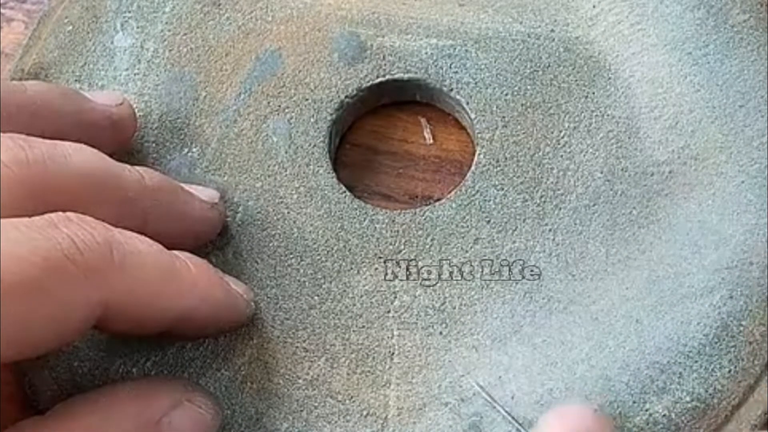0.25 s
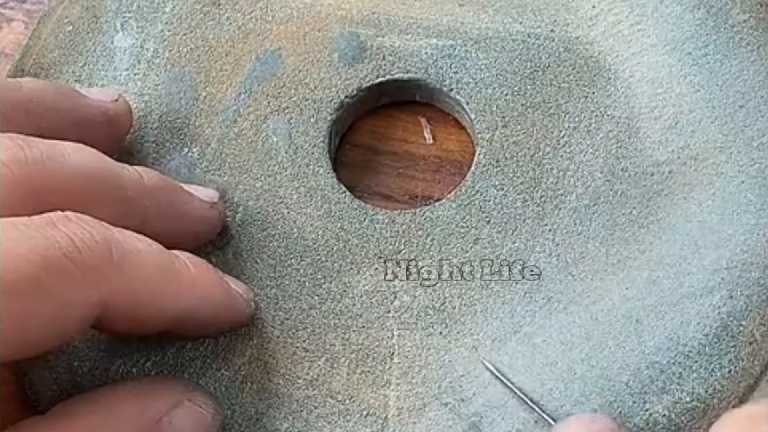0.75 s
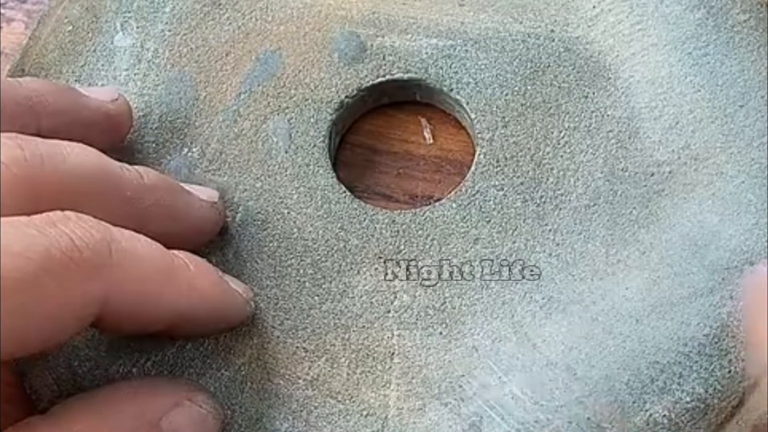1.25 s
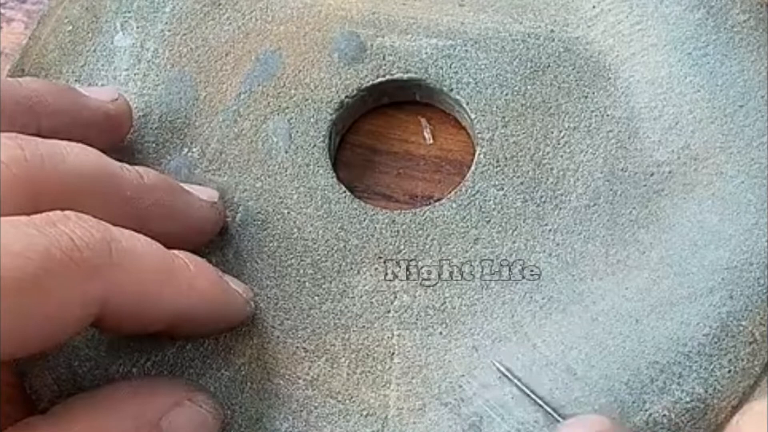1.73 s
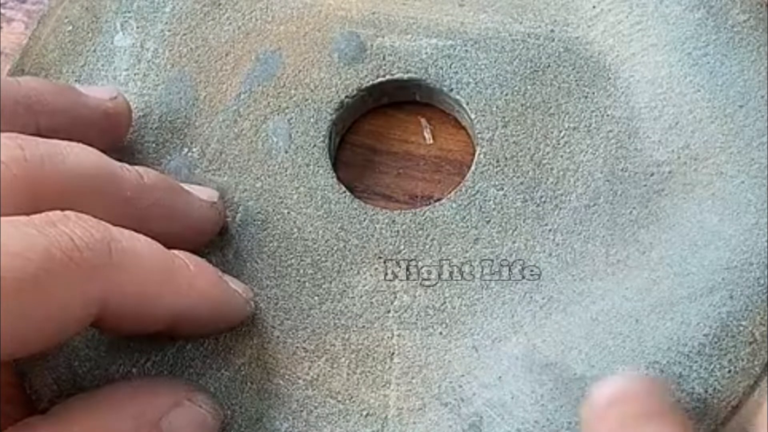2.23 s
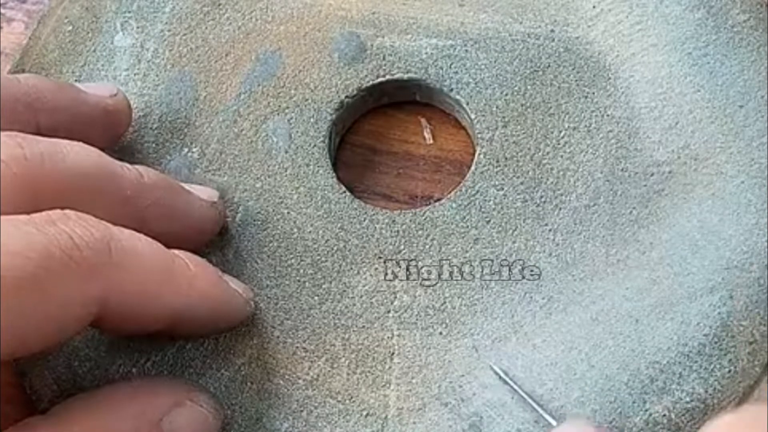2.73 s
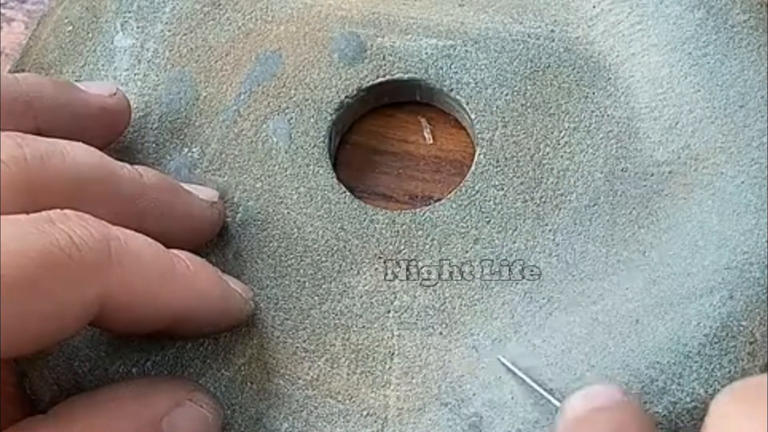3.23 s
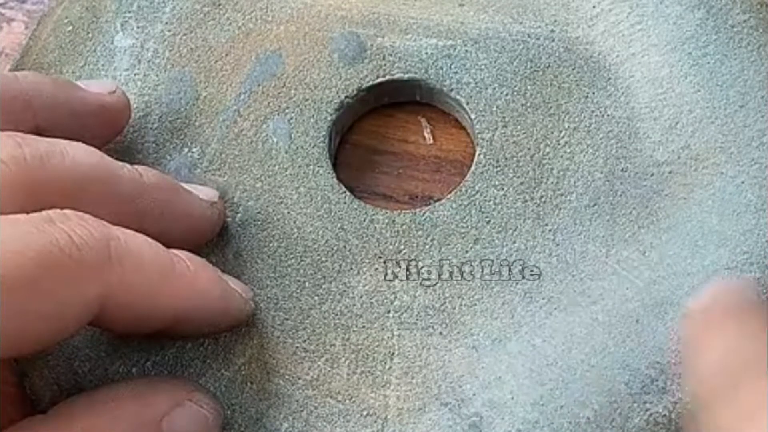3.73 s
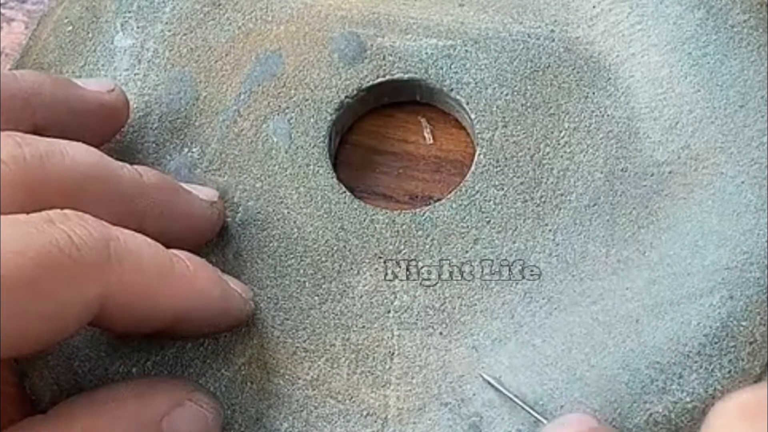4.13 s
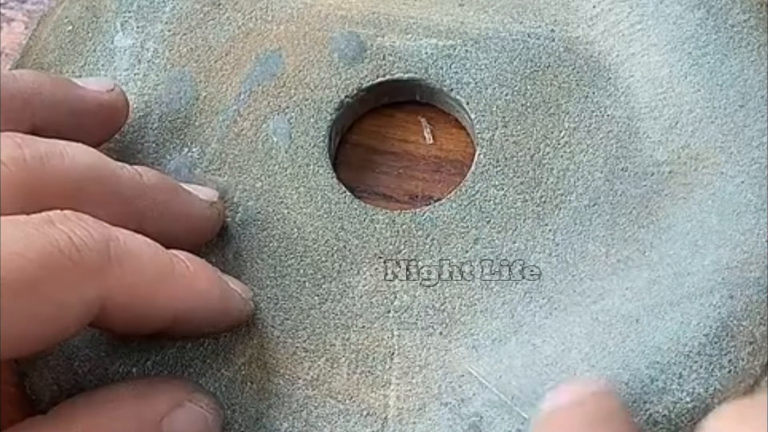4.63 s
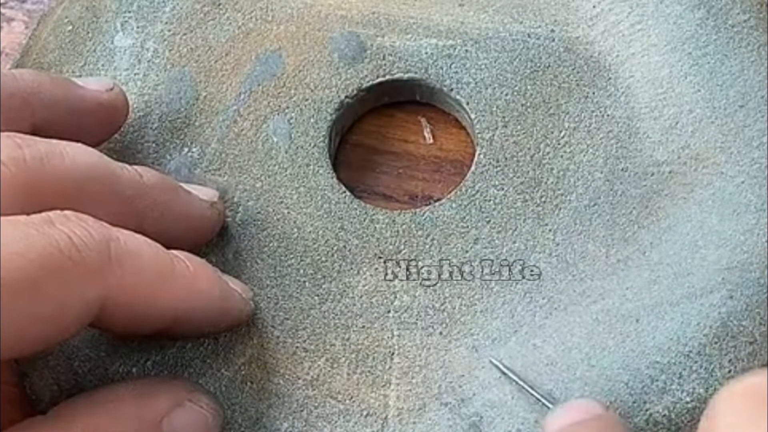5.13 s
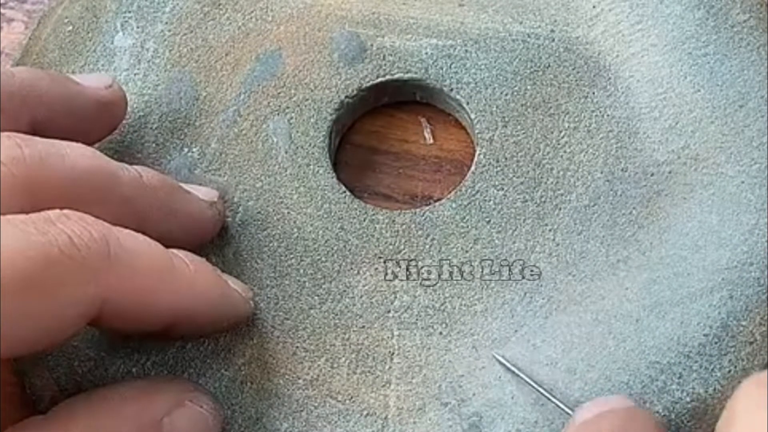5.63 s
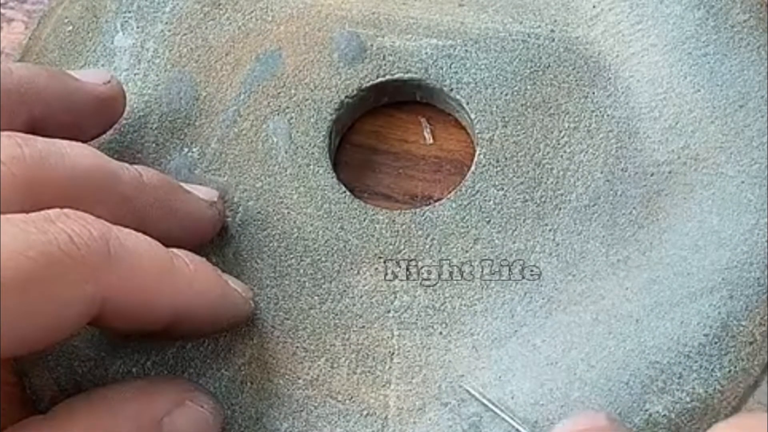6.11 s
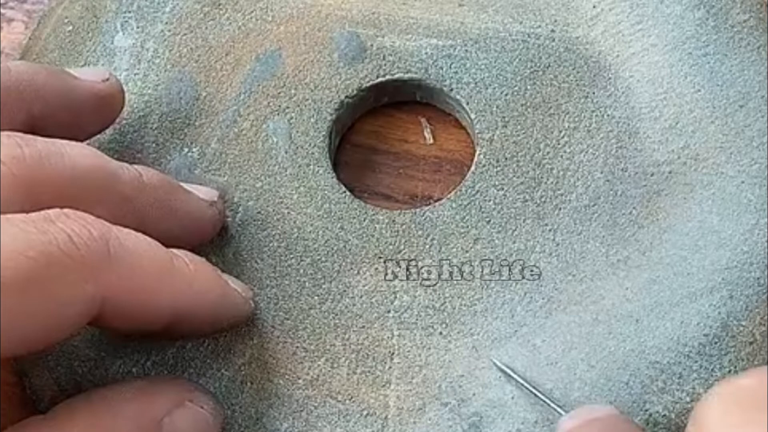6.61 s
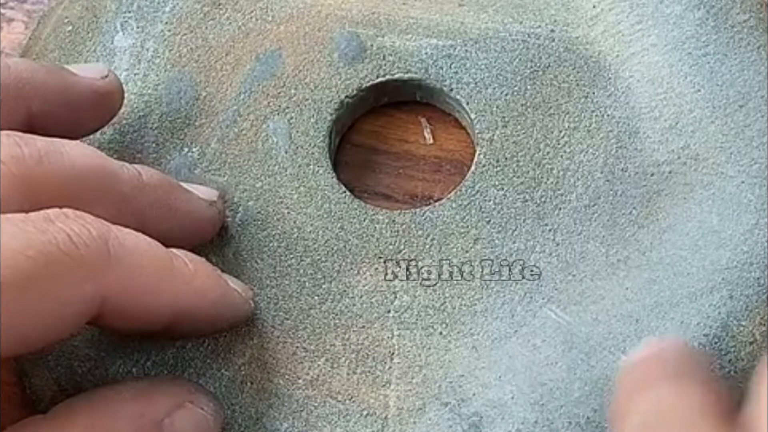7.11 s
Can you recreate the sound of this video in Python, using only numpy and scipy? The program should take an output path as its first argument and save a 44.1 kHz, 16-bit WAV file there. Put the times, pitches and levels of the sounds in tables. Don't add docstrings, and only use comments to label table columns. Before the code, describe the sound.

Dry, gritty metal-on-stone scraping, close to the microphone outdoors: seven fast bursts, the first caught mid-action and the last cut off. Each stroke swells and fades, mixing bright hiss with a woody low-mid growl, occasional grain clicks and thin wire tones. Between bursts are a faint bird whistle, soft hand brushes and one light tap. Low wind lumps and a faint far hush lie underneath, with only a short, faint reflection.

```python
import sys
import numpy as np
from scipy import signal
from scipy.fft import rfft, irfft, next_fast_len
from scipy.io import wavfile
from scipy.ndimage import uniform_filter1d

SR = 44100
rng = np.random.default_rng(int(sys.argv[2]) if len(sys.argv) > 2 else 0)


def persist_wave(psi):
    counts = np.round(np.clip(psi, -1, 1) * 32767).astype(np.int16)
    wavfile.write(sys.argv[1], SR, np.atleast_2d(counts).T)


def elevation(decibels):
    levels = np.asarray(decibels, float)
    return 10 ** (levels / 20)


N = 324840

# (start [s], scrape level [dB], its rise over the stroke [dB], wheel over scrape [dB], its rise [dB])
OUT_STROKES = [(-.11, -39.5, -6, 7, 4), (.18, -38, 17.5, -3, 26), (.972, -39.5, 6.5, 2.5, -9),
               (1.262, -33.5, 12, -1.5, 13), (2.147, -38.5, 4, 7.5, 5.5), (2.423, -35.5, 8.5, -1, 11),
               (3.273, -39, 4, 2.5, -1), (3.555, -39, 16.5, 1.5, -2), (4.425, -36, 15, 1.5, -6),
               (4.722, -34, 10, -1.5, 9), (5.75, -36.5, 10, -2.5, 10), (6.05, -33.5, 10.5, 1, 8),
               (7.035, -38.5, 11.5, -0.5, -8), (7.318, -34, 11, -3.5, -7)]
BACK_STROKES = [(.032, -34.5, -7, 9.3, -3.5), (.298, -35.5, 3.5, 6.7, 6), (1.111, -32, -4, 9.4, 10.5),
                (1.394, -31.5, 5, 6.4, 7), (2.27, -34, -0.5, 9.2, 14), (2.552, -36, -22.5, 8.5, 21),
                (3.404, -35, 0, 6.6, 4.5), (3.665, -36, -9.5, 7.5, 25), (4.57, -32.5, -1, 5.8, 6),
                (4.85, -31.5, -6.5, 6.7, 12), (5.886, -32, -9, 7.6, 15), (6.159, -33, -13.5, 8.2, 16),
                (7.184, -33, 4, 5.1, 5)]
# (drag left at the start [dB], drag left at the end [dB],
# share of the stroke where speed peaks [0-1], power of speed while gaining [1], while slowing [1])
HAND_SPEED = [(-20.5, -21, 0.38, 0.83, 1.2), (-23.5, -25.5, 0.51, 1.74, 1.42),
              (-4.5, -26.5, 0.49, 1.15, 2.1), (-23.5, -32.5, 0.31, 1.34, 2.63)]
# (low rocking of the wheel [dB], table knock [dB], shank 5-7 kHz [dB],
# tip 12-15 kHz [dB], upper over lower face [dB])
GRIPS = [(0.5, -1.5, -4.5, 1, -3.5), (1.5, -0.5, -1.5, 1, -2), (1, 2.5, -1.5, -2, -3.5),
         (0, -1.5, -0.5, 0.5, -0.5)]
# (face [dB], table knock [dB], shank [dB], tip [dB],
# upper over lower face [dB])
PATCHES = [(-7, -2.5, -2.5, -1.7, -2.5), (-5.5, -1, -0.2, -1.2, -0.5), (-1.9, 1.2, 1.5, 0.2, 1),
           (-2.2, 0.5, 1.2, -3, 0.9), (-4.5, 0.2, 1.1, -2, 0.2), (-0.5, 0.1, 1.9, -2.5, -1.7),
           (-2.1, 1.5, 2.5, -3, 0.3)]
LAST_S = 0.18
OUT_ARCH, BACK_ARCH = 0.85, 1.06
LANDING_S, TURN_S = 0.03, 0.004

# (frequency [Hz], width [Hz], level [dB])
WHEEL_MODES = [(218, 39.3, -6), (261.5, 12.6, -7.5), (327, 38, -3.5), (395, 52.3, -4.5), (430, 106, -9.5),
               (499.6, 38.4, -11.5)]
# (frequency [Hz], width [Hz], level [dB])
TABLE_MODES = [(610, 94, -5.5), (738, 210, -4), (951, 88, 1), (1128, 108, 0.5), (1250, 440, -8.5)]
# (frequency [Hz], width [Hz], level [dB])
WIRE_MODES = [(5780, 31, -21), (6230, 24, -21), (6730, 40, -20), (12100, 30, -29), (12230, 20, -26)]
WANDER_DB, WANDER_S = 2.5, 0.09
# (frequency [Hz], density [dB per Hz])
FACE_SPECTRUM = [(1200, -36), (1600, -26.5), (1900, -3), (2150, -3.5), (2500, 1), (2900, 2), (3400, 5),
                 (3950, 3.5), (4250, -3), (4700, -8.5), (6000, -29)]
# (frequency [Hz], density [dB per Hz])
SCRAPE_SPECTRUM = [(3500, -20), (4400, -13), (5000, -14), (5600, -8.5), (7200, -11), (8900, -11.5),
                   (9450, -11.5), (9700, -2), (10300, -3.5), (10900, -5), (11300, -10), (12400, -10),
                   (13600, -17.5), (15900, -20)]
# (time [s], peak level [dB])
GRAINS = [(0.0623, -23), (1.431, -22), (1.4334, -21), (1.498, -35), (2.229, -20.5), (3.771, -18),
          (4.4378, -26), (4.6433, -28), (5.79, -25), (5.9544, -10.5), (6.1294, -30), (6.2605, -17.5),
          (7.055, -22)]
# (time [s], length [s], frequency [Hz],
# width [Hz], level [dB])
THIN_NOTES = [(.095, .048, 5810, 50, -43), (.097, .022, 6760, 40, -45), (.145, .05, 2730, 45, -47),
              (1.005, .03, 3020, 30, -42), (1.11, .04, 3340, 50, -50), (1.025, .045, 2665, 50, -48),
              (1.055, .035, 2480, 60, -46), (1.077, .038, 2960, 15, -39), (1.46, .105, 12230, 10, -51),
              (2.33, .08, 5810, 60, -50), (2.6, .085, 12230, 10, -52), (3.6, .1, 12230, 20, -57),
              (3.74, .06, 12230, 10, -50), (4.44, .12, 5900, 50, -50), (4.63, .065, 5830, 50, -45),
              (5.86, .04, 3245, 20, -44), (5.865, .07, 2895, 20, -44), (5.95, .065, 5810, 35, -44),
              (6.08, .065, 12230, 15, -49), (6.1, .065, 2650, 50, -47), (6.35, .025, 2480, 60, -57)]

# (time [s], length [s], level [dB], frequency [Hz], width [Hz])
TOUCHES = [
    (.922, .045, -54, 2200, 2000),
    (.922, .04, -65, 4500, 3000),
    (6.66, .14, -54, 3600, 2400),
    (6.69, .08, -57, 2800, 300),
    (6.69, .06, -62, 10000, 5000),
    (1.325, .05, -34, 200, 60),
    (1.7, .04, -72, 10000, 4000),
]
# (time [s], level [dB])
TAPS = [
    (3.0457, -30),
    (3.047, -38),
]

# (time [s], length [s], level [dB], frequency [Hz], fade [dB])
BIRD_NOTES = [
    (0.461, 0.077, -42.5, 2640, -13),
    (0.72, .05, -51, 2120, -12),
    (0.748, .085, -62, 1860, -6),
    (5.132, 0.063, -41.5, 2640, -25),
    (5.489, .04, -61, 2210, -13),
    (5.502, 0.11, -54, 1880, -9.5),
]
RISE_S, DROP, DROP_S = 0.012, 0.057, 0.017

# (time [s], level [dB], width [s])
GUSTS = [(0.09, -41.0, 0.09), (0.19, -39.5, 0.05), (0.61, -47, 0.04), (0.77, -37.5, 0.097),
         (0.9, -35, 0.038), (1.0, -41, 0.04), (1.22, -42, 0.07), (1.42, -39.5, 0.05), (1.65, -36, 0.038),
         (1.83, -39.0, 0.083), (1.95, -32.5, 0.027), (2.2, -36, 0.05), (2.32, -43, 0.19),
         (2.53, -32.5, 0.031), (2.64, -53, 0.051), (3.42, -36.5, 0.065), (3.52, -39, 0.092),
         (3.62, -36, 0.029), (3.77, -45.5, 0.062), (3.969, -29.5, 0.045), (4.05, -39.5, 0.02),
         (4.11, -44, 0.032), (4.63, -38.0, 0.07), (4.77, -40.0, 0.09), (4.99, -43, 0.04),
         (5.82, -38.5, 0.033), (5.95, -30, 0.05), (6.15, -35, 0.045), (6.3, -30, 0.063),
         (7.25, -40.0, 0.15)]
# (time [s], level [dB])
BREEZE = [(0., -51), (.6, -55.5), (1., -50), (2.6, -51.5), (3., -59), (3.5, -56), (4.3, -58), (5., -47.5),
          (5.7, -61.5), (6.2, -46.5), (6.9, -66), (7.37, -56)]
# (frequency [Hz], density [dB per Hz])
WIND_SPECTRUM = [(20, -33), (31, -4), (42, -5), (58, -1), (80, -7), (128, -9), (162, -29), (300, -35.5),
                 (500, -74)]

# (start [s], end [s], level at the start [dB])
HUSH_PAUSES = [
    (.47, 0.95, -59.5),
    (1.557, 2.13, -55.5),
    (2.72, 3.252, -57),
    (3.83, 4.41, -57),
    (5.01, 5.73, -54.5),
    (6.335, 7.014, -54.5),
]
# (frequency [Hz], density [dB per Hz])
AIR_SPECTRUM = [(53, -16), (90, -6), (136, 1.5), (165, -10), (196, -4), (266, -10), (401, -6), (498, -12.5),
                (995, -14), (1300, -18.5), (6680, -29.5), (8700, -30.5), (12000, -44.5), (15900, -61)]
SINK_DB_PER_S, SINK_BRIGHT_DB = 11.5, -0.5


def strokes():
    scrape, shove, rock, low_face, high_face, knock, shank, tip = pressure()
    slips = np.cumsum(SR / 280 * rng.gamma(4, 1 / 4, 4000)).astype(int)
    fine = grit(slips, 2.6, 0.0009, 0.8)
    coarse = grit(slips, 2.6, 0.0007, 0.7)

    wheel = steadied(modes(coarse + fine, WHEEL_MODES[2:], WANDER_DB), 0.054, 0.44)
    rocking = steadied(modes(fine, WHEEL_MODES[:2], WANDER_DB), 0.011, 0.3)
    table = steadied(modes(coarse, TABLE_MODES, WANDER_DB), 0.0082, 0.4)
    out = shove * wheel + elevation(-9) * rock * rocking + elevation(-6.5) * knock * table

    face = steadied(patchy(colour(coarse, FACE_SPECTRUM), 2.9, bins=3, frames=30), 0.013, 0.55)
    upper_face = above(face, 2610)
    out += low_face * (face - upper_face) + high_face * upper_face

    hiss = patchy(colour(fine + 0.5 * coarse, SCRAPE_SPECTRUM), 3.5, bins=5, frames=30)
    hiss = steadied(hiss + elevation(38) * modes(fine, WIRE_MODES, WANDER_DB), 0.016, 0.3)
    upper, top = above(hiss, 7800), above(hiss, 11300)
    return out + shank * (hiss - upper) + scrape * (upper - top) + tip * top


def pressure():
    gains = np.zeros((8, N))
    rows = sorted(OUT_STROKES + BACK_STROKES)
    for k, (s, scrape_db, rise_db, wheel_db, wheel_rise_db) in enumerate(rows):
        place = k % len(HAND_SPEED)
        trails_off = place == len(HAND_SPEED) - 1 or k == len(rows) - 1
        end = s + LAST_S if trails_off else rows[k + 1][0]
        start_db, end_db, peak, gaining, slowing = HAND_SPEED[place]
        rock_db = GRIPS[place][0]
        face_db, *patch_db = PATCHES[k // len(HAND_SPEED)]
        knock_db, shank_db, tip_db, edge_db = np.add(GRIPS[place][1:], patch_db)

        lead = TURN_S if place else LANDING_S
        t = np.arange(max(s - lead, 0), end + TURN_S, 1 / SR)
        fade_in = (t - s + lead) / (lead + TURN_S)
        fade_out = (end - t) / TURN_S / 2 + 0.5
        overlap = np.clip(np.minimum(fade_in, fade_out), 0, 1)

        u = np.clip((t - s) / (end - s), 0, 1)
        speed = np.sin(np.pi * np.interp(u, [0, peak, 1], [0, 0.5, 1]))
        drag = elevation(start_db + (end_db - start_db) * u)
        arch_db = 20 * np.log10(abs(speed) ** np.where(u < peak, gaining, slowing) + drag)
        wheel_arch = BACK_ARCH if k % 2 else OUT_ARCH
        shove_db = wheel_db + wheel_rise_db * (u - 0.5) + (wheel_arch - 1) * arch_db
        table_db = 0.35 * shove_db + knock_db
        over_db = (0, shove_db, shove_db + rock_db, face_db - edge_db, face_db + edge_db,
                   table_db, shank_db, tip_db)
        for gain, db in zip(gains, over_db):
            add(gain, t[0], elevation(scrape_db + rise_db * (u - 0.5) + arch_db + db) * overlap)
    return gains


def grit(at, spread_db, seconds, steady):
    inside = at < N
    slips = np.zeros(N)
    slips[at[inside]] = elevation(spread_db * np.minimum(rng.exponential(1, len(at)), 4))[inside]
    bursts = signal.oaconvolve(slips, np.exp(-np.arange(400) / SR / seconds))[:N]
    return evened((steady + evened(bursts)) * rng.standard_normal(N))


def grains():
    puffs = np.zeros(N)
    n = np.arange(400)
    for s, db in GRAINS:
        decay = elevation(db - 5 - n / SR / 0.00059)
        add(puffs, s, decay * rng.standard_normal(400) * np.minimum(n / 12, 1))
    point = colour(colour(puffs, SCRAPE_SPECTRUM), [(9000, -2), (13000, 1)])
    return elevation(-0.5) * colour(puffs, FACE_SPECTRUM) + elevation(3) * point


def thin_notes():
    out = np.zeros(N)
    for s, length, hz, width, db in THIN_NOTES:
        note = steadied(resonate(rng.standard_normal(8000), hz, width), 0.0078, 0.55)
        note = note[-round(length * SR):]
        add(out, s, elevation(db) * note * signal.windows.tukey(len(note), 0.3))
    return out


def touches():
    out = np.zeros(N)
    for s, length, db, hz, width in TOUCHES:
        noise = rng.standard_normal(round(length * SR))
        brush = resonate(resonate(noise, hz, width), hz, 2 * width)
        add(out, s, elevation(db) * evened(brush) * np.hanning(len(brush)))
    return out


def taps():
    out = np.zeros(N)
    t = np.arange(3000) / SR
    tones = sum(level * np.sin(2 * np.pi * hz * t) for hz, level in ((7800, 1), (11600, 0.22), (14200, 0.08)))
    ring = t / 0.00009 * np.exp(-t / 0.00025) * tones
    noise = resonate(resonate(rng.standard_normal(3000), 8400, 3000), 7600, 3000)
    rattle = elevation(-29) * np.exp(-t / 0.023) * evened(noise)
    for s, db in TAPS:
        add(out, s, elevation(db) * (ring + rattle))
    return out


def birds():
    out = np.zeros(N)
    for start, length, db, hz, fade_db in BIRD_NOTES:
        t = np.arange(0, length, 1 / SR)
        pitch = hz * (1 + DROP * np.exp(-t / DROP_S))
        level = elevation(db + fade_db * t / length) * np.minimum(t / RISE_S, 1)
        core, blur = (evened(resonate(resonate(rng.standard_normal(len(t)), pitch, width), pitch, width))
                      for width in (90, 600))
        whistle = evened(core + (0.3 - fade_db / 14 * np.exp(-t / 0.071)) * blur)
        add(out, start, level * whistle * signal.windows.tukey(len(t), 0.2))
    return out


def yard(x):
    taps = np.zeros(SR // 2)
    at = np.arange(100, SR // 2 - 20, 20)
    taps[at + rng.integers(0, 20, len(at))] = rng.choice([-1., 1.], len(at))
    hz, t, z = signal.stft(taps, SR, nperseg=256)
    decay_s = read([(300, 0.22), (3000, 0.18), (12000, 0.061)], hz)[:, None]
    tail = signal.istft(z * elevation(-60 * t / decay_s), SR, nperseg=256)[1]
    return signal.fftconvolve(x, tail / np.linalg.norm(tail))[:N]


def wind():
    t = np.arange(0, N + 64, 64) / SR
    power = elevation(np.interp(t, *np.transpose(BREEZE))) ** 2
    for s, db, width in GUSTS:
        power += elevation(db) ** 2 * np.exp(-(2.03 * (t - s) / width) ** 2)
    level = np.interp(np.arange(N) / SR, t, np.sqrt(power))
    return level * steadied(colour(rng.standard_normal(N), WIND_SPECTRUM), 0.046, 0.27)


def hush():
    frames = N // 128 + 5
    hz = np.fft.rfftfreq(512, 1 / SR)
    a, b, patches = rng.standard_normal((frames, 257, 3)).T
    patches = evened(uniform_filter1d(uniform_filter1d(patches, 6, 0), 20, 1))
    s = np.ravel([(start, end) for start, end, _ in HUSH_PAUSES])
    db = np.ravel([(top, top - SINK_DB_PER_S * (end - start)) for start, end, top in HUSH_PAUSES])
    level_db = np.interp(np.arange(frames) * 128 / SR, s, db)
    tilt_db = SINK_BRIGHT_DB * np.clip(np.log2(hz / 1500 + 1e-9) / 3, 0, 1)[:, None]
    z = (a + 1j * b) * elevation(1.2 * patches + tilt_db + level_db)
    noise = signal.istft(z, nperseg=512, noverlap=384)[1][:N] / np.sqrt(512)
    return elevation(32) * colour(noise, AIR_SPECTRUM)


def evened(x):
    return x / np.sqrt(np.mean(x ** 2) + 1e-20)


def steadied(x, seconds, share):
    level = uniform_filter1d(x ** 2, round(seconds * SR)) / np.mean(x ** 2)
    return evened(x / (abs(level) + 0.11) ** (share / 2))


def add(mix, s, sound):
    part = mix[round(s * SR):][:len(sound)]
    part += sound[:len(part)]


def read(points, hz):
    f, value = np.transpose(points)
    return np.interp(np.log(hz + 1), np.log(f + 1), value)


def colour(x, points):
    size = next_fast_len(len(x))
    gain = elevation(read(points, np.fft.rfftfreq(size, 1 / SR)))
    return irfft(rfft(x, size) * gain, size)[:len(x)]


def above(x, hz):
    return signal.sosfiltfilt(signal.butter(4, hz, "high", fs=SR, output="sos"), x)


def resonate(x, hz, width):
    turn = np.exp(2j * np.pi * np.cumsum(hz * np.ones(len(x))) / SR)
    r = np.exp(-np.pi * width / SR)
    return 2 * (turn * signal.lfilter([1 - r], [1, -r], x / turn + 1e-18)).real


def modes(x, table, wander_db=0):
    drift = rng.standard_normal((len(x) // 256 + 1, len(table)))
    drift = uniform_filter1d(drift, round(WANDER_S * SR / 256), 0)
    drift = uniform_filter1d(evened(drift), size=5, axis=0)
    drift = np.repeat(drift, 256, 0)[:len(x)].T
    out = np.zeros(len(x))
    for k, (hz, width, db) in enumerate(table):
        ringing = resonate(resonate(x, hz, 2.43 * width), hz, 2.43 * width) / np.sqrt(width)
        out += (-1) ** k * elevation(db + wander_db * drift[k]) * ringing
    return out


def patchy(x, depth_db, bins, frames):
    z = signal.stft(x, nperseg=256, noverlap=192)[2]
    field = rng.standard_normal(z.shape[::-1]).T
    field = evened(uniform_filter1d(uniform_filter1d(field, bins, 0), frames, 1))
    return evened(signal.istft(z * elevation(depth_db * field), nperseg=256, noverlap=192)[1][:N])


def scene():
    near = strokes() + grains() + thin_notes() + touches() + taps()
    far = birds()
    echoes = yard(elevation(-14) * near + elevation(-9) * far)
    return (near + far + echoes + wind() + hush())[None]


def roll_off(x):
    return signal.sosfilt(signal.butter(12, 16030, fs=SR, output="sos"), x)


def record(dry):
    edge = signal.firwin(511, 15700, window=("kaiser", 9), fs=SR)
    mix = signal.oaconvolve(dry, edge[None], "same")
    return roll_off(mix)


dry = scene()
out = record(dry)
persist_wave(out)
```